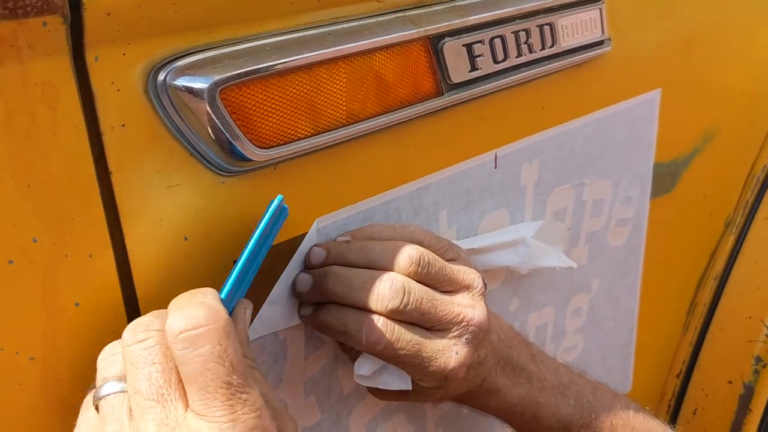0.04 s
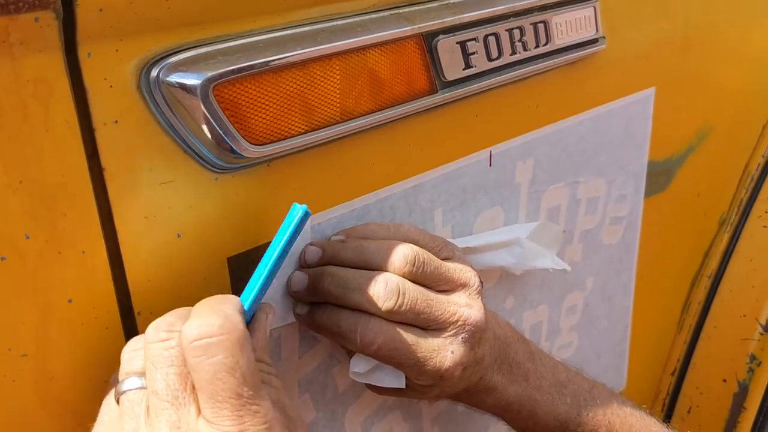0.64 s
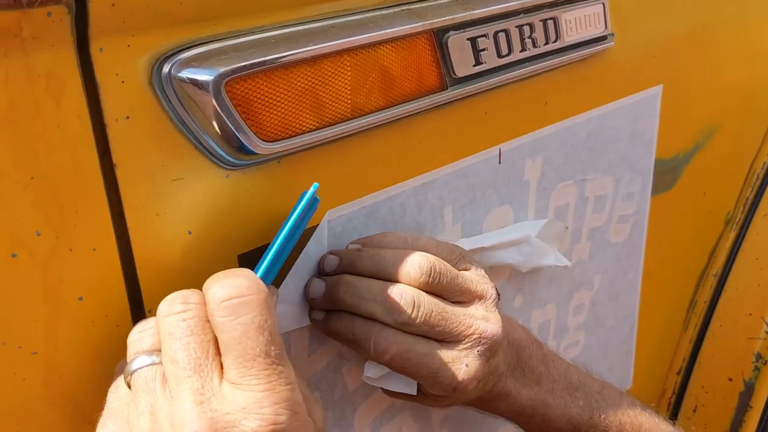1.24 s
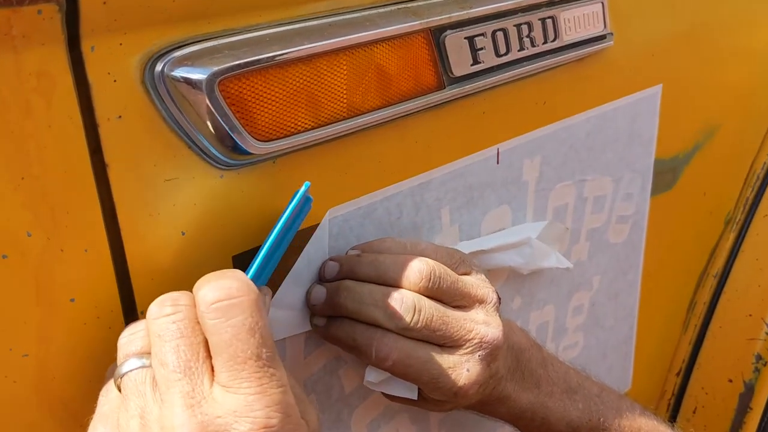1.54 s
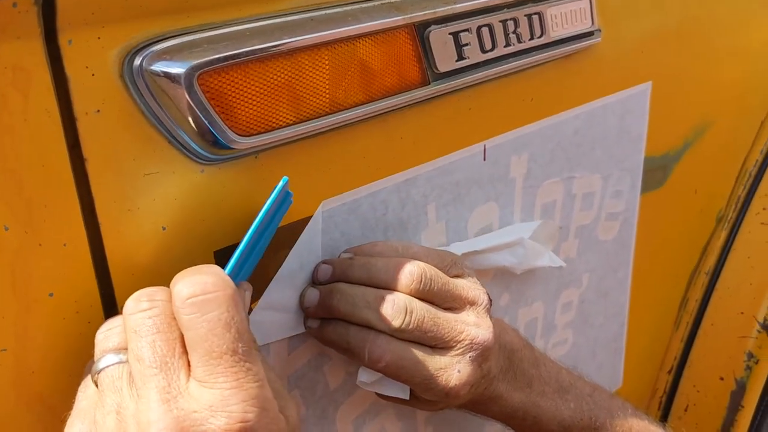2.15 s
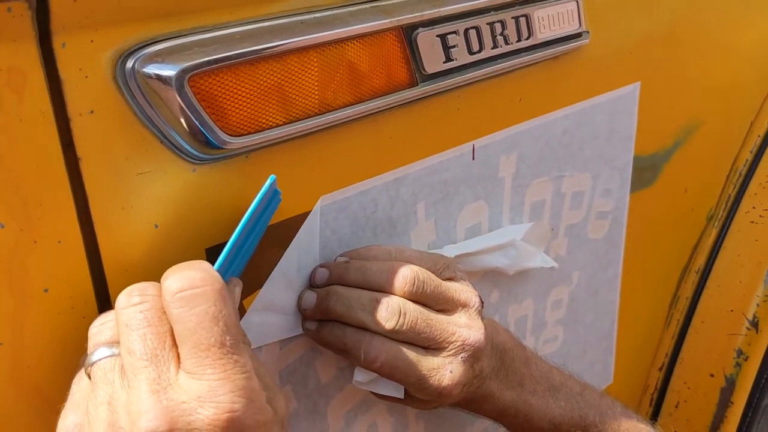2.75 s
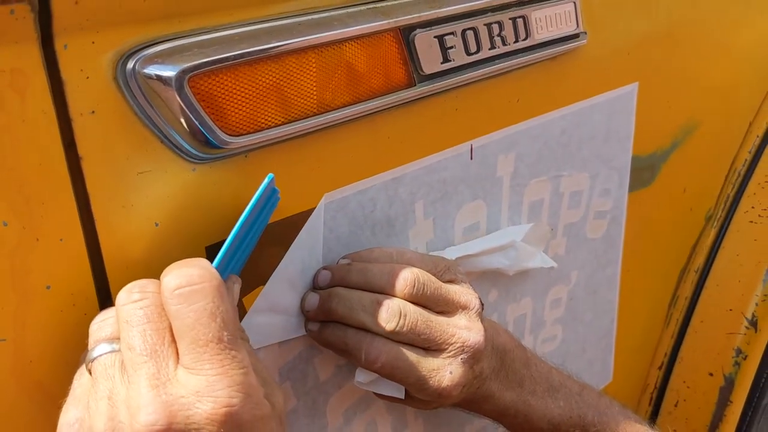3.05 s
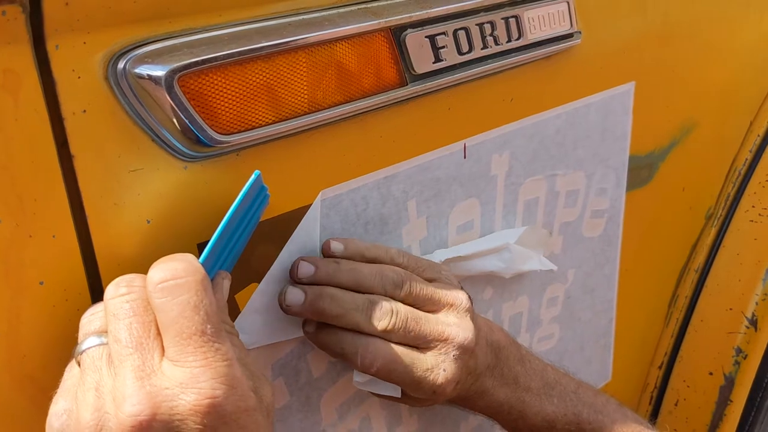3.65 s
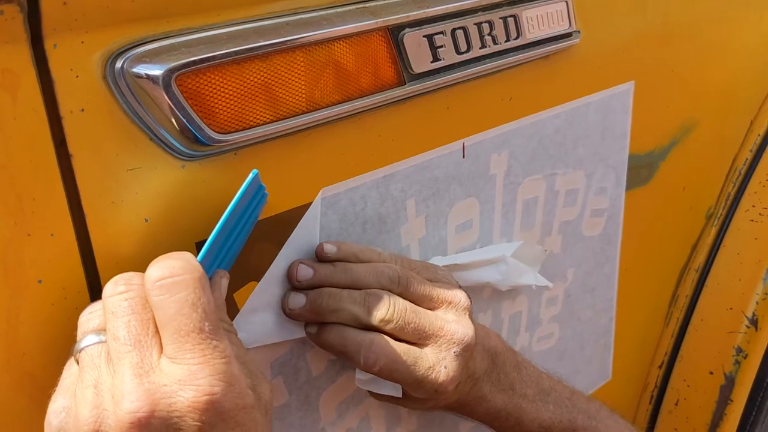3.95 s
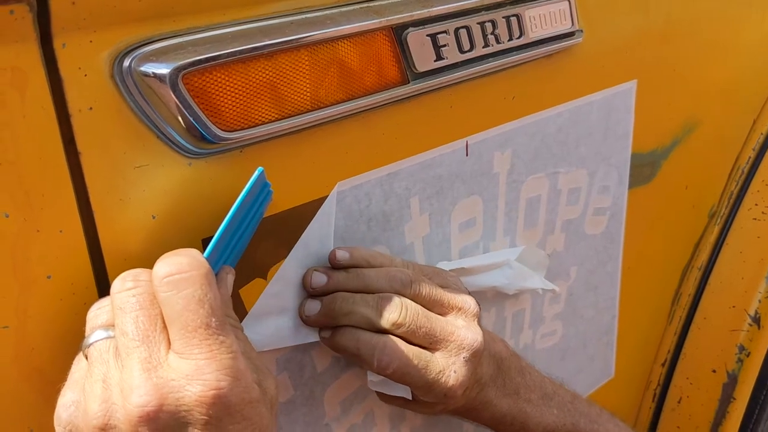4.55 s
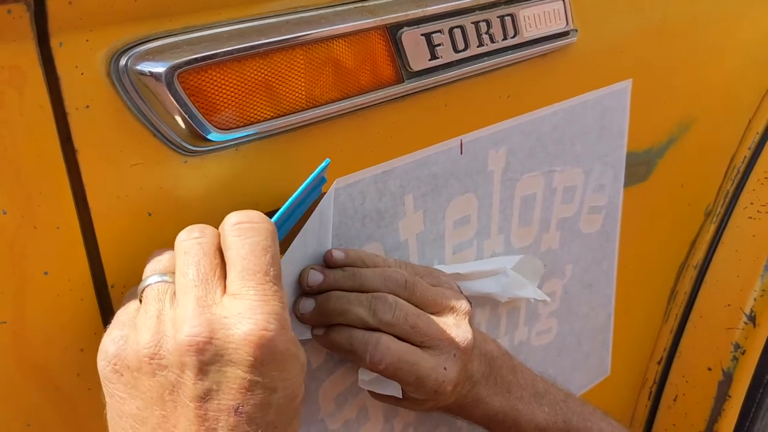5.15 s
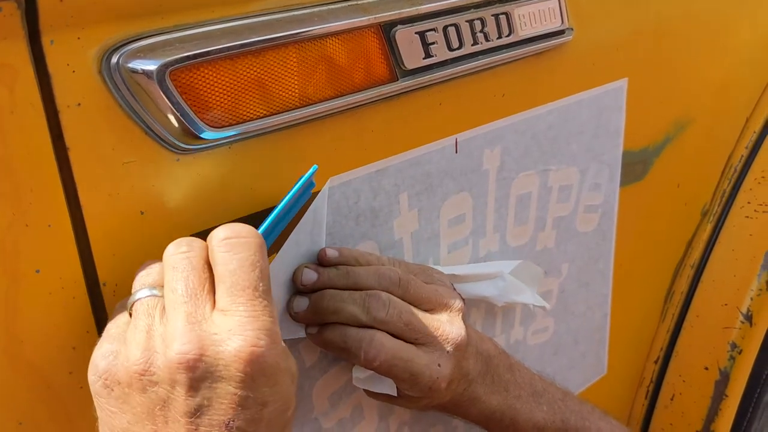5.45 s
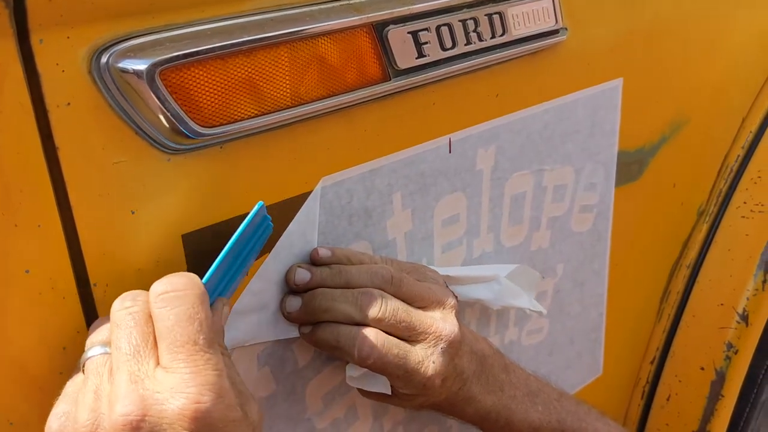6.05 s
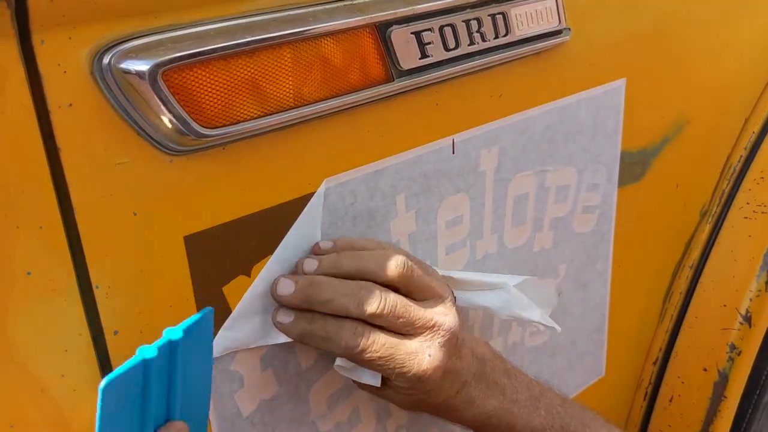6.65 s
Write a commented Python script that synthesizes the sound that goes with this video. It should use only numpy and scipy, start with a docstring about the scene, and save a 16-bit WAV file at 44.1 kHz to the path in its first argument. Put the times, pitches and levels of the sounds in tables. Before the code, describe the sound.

In a quiet workshop, three quick plastic knocks set a steel door panel ringing. Glue then crackles faintly as a paper sheet is pulled away by hand, with crisp snaps around the middle, soft rubbing strokes from a squeegee and fingers, and a last burst of crinkling. The microphone is close, picking up faint room air and a light rumble of moving air on the left.

```python
"""At a steel vehicle door in a quiet workshop, paper backing is slowly peeled off a stencil at arm's length. A
plastic squeegee knocks three times, setting the panel ringing; then it and the fingers rub and snag over the
paper. The glue lets go thread by thread in a fine crackle; the sheet ticks, slips and crinkles as it buckles.
Underneath lie room air, a soft low drone and a light draught brushing the left microphone port."""
import sys
import numpy as np
from scipy import signal
from scipy.fft import rfft, irfft
from scipy.io import wavfile
from scipy.ndimage import uniform_filter1d

SR = 44100
rng = np.random.default_rng(int(sys.argv[2]) if len(sys.argv) > 2 else 0)


def waveform_to_disk(signal):
    """Save audio, clipped to [-1, 1], as 16-bit WAV at the path in sys.argv[1]."""
    frames = np.transpose(np.atleast_2d(signal))
    scaled = np.clip(frames, -1, 1) * 32767
    samples = np.round(scaled).astype(np.int16)
    wavfile.write(sys.argv[1], SR, samples)


N = 303849
TIME = np.arange(N) / SR

# tone of the room air: f/Hz, level/dB
ROOM_EQ = [(20, 0.5), (70, 5), (200, 0), (350, -4.5), (500, 0.5), (700, -2), (1000, -0.5), (1200, -0.5),
           (1380, 2), (1600, -4.5), (2000, -2), (5000, -1.5), (6600, -7.5), (9000, 1), (15000, -1.5)]
# swells of the low drone: t/s, level/dB
DRONE_SWELLS = [(4.7, -80), (4.84, -65), (5.1, -76), (5.45, -78.5), (6.35, -92), (6.62, -65.5), (6.73, -72),
                (6.88, -61.5)]
# gusts of the draught: peak t/s, level/dB
DRAUGHT_GUSTS = [(0.05, -52.5), (0.24, -53.5), (0.75, -54.5), (1.08, -55.5), (1.39, -54), (1.71, -63),
                 (3.02, -54), (3.5, -59), (4.87, -57.5), (5.1, -58.5), (5.9, -56), (6.08, -53), (6.62, -58),
                 (6.87, -58)]
# eddies popping on the left port: t/s, level/dB, f/Hz
PORT_EDDIES = [(0.744, -42.5, 125), (0.913, -46.5, 103), (0.979, -48, 88.6), (1.022, -46.5, 96),
               (1.099, -50, 84.6), (1.123, -50.5, 148), (1.227, -53, 80), (1.355, -48.5, 192),
               (1.39, -43.5, 100), (1.425, -49, 125), (1.516, -50.5, 130), (1.614, -50, 81),
               (2.843, -39, 226), (2.856, -41, 104), (2.995, -44, 220), (3.007, -37, 101),
               (3.019, -45, 210), (3.032, -42.5, 100), (3.072, -48, 205), (3.084, -44.5, 99),
               (5.902, -45, 146)]
# rumble of moving air: f/Hz, level/dB
DRAUGHT_EQ = [(20, -41), (50, 5), (90, 5), (160, -3.5), (280, -15), (500, -31.5), (1500, -40)]

# main modes of the door skin: f/Hz, level/dB
PANEL_MODES = [(166, -9), (198, -9), (231, -11.5), (264, -11), (297, -8), (351, -8), (405, -5), (468, 2),
               (515, -2), (555, -9), (701, -3), (858, -9), (1049, 0.5), (1361, -7.5), (2164, -6),
               (2274, -7)]
# dense wash between those modes: f/Hz, level/dB, t60/s
PANEL_WASH = [(100, -14, 1.0), (171, -0.5, 1), (315, 6.5, 0.53), (487, 9, 0.54), (634, -4, 0.33),
              (880, 8.5, 0.34), (1620, -1.5, 0.16), (2200, -1.5, 0.15), (4000, -2.5, 0.089),
              (7960, -30, 0.052), (13970, -28, .04)]
# squeegee hits on the door: t/s, crack/dB, edge/dB, blade note f/Hz, blade/dB, clack f/Hz, clack/dB,
# thud/dB, singing note f/Hz, singing note/dB, panel ring/dB, low drum boost/dB
DOOR_KNOCKS = [(0.3622, -13.5, -23, 3450, -30, 2260, -22, -63, 291, -57, -39.5, -8.5),
               (0.5135, -8, -10.5, 7300, -32, 1110, -19.5, -32.5, 486, -40, -42, 1),
               (0.6958, -16.5, -50, 6300, -36, 1020, -44, -44, 472, -47, -42.5, -4.5)]
# crack of plastic on steel: f/Hz, level/dB
CRACK_EQ = [(100, -27), (400, -1), (1200, 5), (3000, 1.5), (5000, 3.5), (8000, -0.5), (11000, -13.5),
            (15000, -8)]
# bright edge on hits, ticks and rasps: f/Hz, level/dB
EDGE_EQ = [(3000, -25), (7000, 3), (10000, 0.5), (12000, 0.5), (14200, 4.5), (16000, -6.5)]

# the blade judders as it is turned: t/s, level/dB
SQUEAK_SWELL = [(6.41, -54), (6.435, -51.5), (6.48, -60.5)]
# the blade or the fingers snag on the paper: t/s, level/dB, decay/s
PAPER_SNAGS = [(3.4995, -57, .008), (3.6885, -58, .004), (3.704, -45.5, 0.013), (3.811, -52, .005),
               (4.9033, -41.5, 0.0031), (4.92, -47, .004), (5.032, -43, 0.0045), (5.1733, -45, 0.0034),
               (5.275, -50, 0.0046), (5.2955, -46, .004), (5.354, -47, .003)]
# scratch of a snag: f/Hz, level/dB
SNAG_EQ = [(300, -15), (1000, -1.5), (2600, 2.5), (7000, -3.5), (15000, -30)]
# the blade swipes over the paint: start/s, peak/s, end/s, hiss/dB, rasp/dB, body/dB
PAINT_SWIPES = [(-0.02, 0.071, 0.19, -54, -53.5, -55.5), (0.409, 0.502, 0.52, -50.5, -46.5, -55.5),
                (6.548, 6.645, 6.73, -92, -71, -73)]
# fingers and squeegee rub the paper: start/s, end/s, hiss/dB, body/dB, body f/Hz
PAPER_STROKES = [(3.474, 3.547, -59, -69, 1500), (3.52, 3.642, -68, -63, 2060),
                 (3.688, 3.827, -62, -57.5, 1820), (3.799, 3.96, -61.5, -63, 1380),
                 (4.101, 4.32, -65, -67, 940), (4.252, 4.65, -78, -70.5, 1300),
                 (4.706, 4.965, -68.5, -69, 1050), (4.884, 5, -64.5, -61, 1090),
                 (5.015, 5.129, -62, -58.5, 970), (5.11, 5.204, -53.5, -55.5, 1040),
                 (5.153, 5.207, -68, -52.5, 960), (5.277, 5.38, -60.5, -58.5, 1020),
                 (5.392, 5.482, -57.5, -49, 940), (5.659, 5.94, -68.5, -65.5, 890),
                 (5.86, 6.33, -65.5, -63.5, 1050), (6.486, 6.7, -63, -67.5, 1130),
                 (6.777, 6.902, -67.5, -60.5, 1470)]
# the hands drift to the left: t/s, delay at the right port/s
HAND_DRIFT = [(3.8, 0.000062), (5.3, 0.00015), (6.7, .00017)]
# hiss of rubbed fibres: f/Hz, level/dB
RUB_EQ = [(150, -5), (700, -8), (1600, -7), (3000, 1.5), (7000, -0.5), (10000, -5), (15000, -12.5)]
# a dragged blade stirs mostly the door's mids: f/Hz, level/dB
DRAG_EQ = [(180, -10.5), (400, -1.5), (950, -1), (2200, -3.5)]

# the sheet catches and slips in a stutter: t/s, level/dB
SHEET_SLIPS = [(6.231, -41.5), (6.3245, -43), (6.343, -44), (6.354, -47), (6.365, -49), (6.375, -47),
               (6.3865, -53), (6.402, -58), (6.4285, -46), (6.466, -47), (6.523, -50), (6.533, -43),
               (6.643, -44)]
# narrow rasp of a slip: f/Hz, level/dB
SLIP_EQ = [(1000, -8), (3500, -31), (5000, -0.5), (6800, -2), (8200, -17), (15000, -29)]
# stiff folds pop through: t/s, level/dB, f/Hz
FOLD_POPS = [(3.457, -24, 5800), (3.4587, -25, 5300), (6.2788, -25, 7500), (6.2822, -11.5, 7000)]
# the sheet buckles: start/s, end/s, crackle/dB, hollow note/dB, fizz/dB
BUCKLES = [(3.4128, 3.418, -42, -45.5, -39), (3.418, 3.44, -48.5, -55, -47), (3.4543, 3.467, -35, -43, -52),
           (6.1985, 6.2244, -35, -61, -35), (6.256, 6.309, -44, -62, -56), (6.274, 6.284, -34.5, -57, -44),
           (6.2774, 6.281, -27.5, -42, -38), (6.2812, 6.284, -23, -58, -25), (6.429, 6.437, -57, -53, -53),
           (6.544, 6.549, -36, -44, -47), (6.654, 6.674, -50, -65, -56), (6.691, 6.716, -56, -62.5, -48.5)]
# the loudest snaps of glue and paper: t/s, snap/dB, edge/dB
LOUD_TICKS = [(1.231, -45, -31), (2.0287, -44, -31), (2.3606, -43, -29.5), (2.3716, -43, -29.5),
              (2.5284, -33, -29), (3.0475, -39, -29.5), (3.053, -37, -26), (3.127, -33, -20.5),
              (3.135, -24, -21), (3.149, -24, -15.5), (3.1617, -19, -39), (3.2898, -35, -29.5),
              (3.4145, -22, -16.5), (3.9842, -24.5, -33), (4.1095, -30, -40), (4.2482, -25, -38),
              (4.347, -33, -38), (6.11, -40, -36.5), (6.451, -25, -32), (6.4658, -24, -38),
              (6.547, -26, -40), (6.6563, -21.5, -38)]
# crisp tone of creasing paper: f/Hz, level/dB
PAPER_EQ = [(300, -26), (1500, -14), (3500, -3), (5600, 2), (7500, 4.5), (10000, 1.5), (15000, -13)]
# how hard the backing is pulled: t/s, level/dB
PEEL_PULL = [(0.85, -66), (0.93, -60), (1.1, -65.5), (1.23, -57.5), (1.75, -59), (2.25, -59), (2.8, -57.5),
             (3.18, -54), (3.39, -61.5), (3.6, -69), (3.95, -61.5), (4.18, -54.5), (4.3, -56),
             (4.42, -57.5), (4.72, -61), (4.87, -66), (5.6, -77), (6.15, -62.5), (6.36, -70), (6.49, -62),
             (6.56, -62), (6.67, -59), (6.75, -77), (6.82, -54.5), (6.88, -58)]
# note of the lifted flap, lower as the flap grows: t/s, f/Hz
FLAP_NOTE = [(0.9, 7100), (3.2, 7200), (4.1, 6440), (6.8, 5900)]
# sizzle of parting glue: f/Hz, level/dB
GLUE_EQ = [(800, -16), (2500, -24), (4000, -7.5), (4500, 3.5), (5000, 0), (7000, -2), (10000, 2.5),
           (12500, 4.5), (15000, 6.5)]

# sharp sounds beam their top to the left; what reaches the right port: f/Hz, level/dB
SHADOW_EQ = [(8000, 0), (11000, -10), (15000, -7.5)]
# tone of the left port: f/Hz, level/dB
LEFT_EQ = [(300, 2), (1050, 0.5), (1350, 4), (1650, 0), (2150, 5.5), (2700, 0.5), (4500, 3.5), (5300, 2.5),
           (6400, -3), (7500, 0.5), (8700, -1), (9800, -4.5), (13000, -2), (16000, -7.5)]
# tone of the right port with its cavity peak: f/Hz, level/dB
RIGHT_EQ = [(300, 2), (1150, -1), (1450, 1.5), (1800, 1.5), (3000, 2), (4700, 3), (5750, 8), (6130, 5),
            (6600, 14), (7050, 8), (7450, 7), (8200, 3.5), (10200, -8.5), (13000, -5.5), (16000, -8.5)]

SWIPE_HZ, SWIPE_LAG_S = 1080, 0.00019  # body note under the blade; delay at the right port
FIRM_DB, FIRM_ATTACK_S, ATTACK_DOUBLES_DB = -53, 0.023, 8  # firm strokes bite fast, light ones ease in
DOOR_DB_PER_OCTAVE = -6.5  # lifted paper hums higher and passes less on to the door
BLADE_T60_S, CLACK_T60_S = .012, 0.0095
THUD_HZ, THUD_T60_S, SING_T60_S = 406.5, 0.17, 0.38  # the steel under the blade thuds, one note sings on
LEAD_IN_DB, LEAD_IN_S = -19, 0.0013  # a very short, faint noise swell leads into each knock


def undb(db):
    """Decibels to gain."""
    return 10 ** (np.asarray(db) / 20)


def along(hz, points, axis=1):
    """Read a column of a table along log frequency."""
    points = np.array(points)
    return np.interp(np.log(np.maximum(hz, 1)), np.log(points[:, 0]), points[:, axis])


def convolve(x, response):
    """Pass one or two channels through an impulse response."""
    return np.apply_along_axis(lambda v: signal.oaconvolve(v, response)[:len(v)], -1, x)


def colour(x, points, keep_power=True, size=4096):
    """Minimum-phase EQ through f/Hz, level/dB points."""
    bins_hz = np.arange(size // 2 + 1) * SR / size
    cepstrum = irfft(np.log(undb(along(bins_hz, points))))
    cepstrum[1:size // 2] *= 2
    cepstrum[size // 2 + 1:] = 0
    response = irfft(np.exp(rfft(cepstrum)))
    return convolve(x, response / np.linalg.norm(response) if keep_power else response)


def resonate(x, hz, width_hz):
    """A steep resonance that keeps the power of white noise."""
    t = TIME[:SR // 20]
    response = t * np.exp(-np.pi * width_hz * t) * np.sin(2 * np.pi * hz * t)
    return convolve(x, response / np.linalg.norm(response))


def grains(per_s, spread_db, aim=1.0):
    """Tiny random clicks, each of its own size and aimed unevenly at the two ports; rms 1."""
    size = undb(spread_db * np.minimum(rng.exponential(size=N), np.log(100)))
    clicks = (rng.random(N) < per_s / SR) * size * rng.choice([-1, 1], N)
    stereo = clicks * (1 + aim * rng.standard_normal((2, N)))
    return stereo / np.std(stereo)


def walk(per_s):
    """Random modulator: sample and hold, slewed twice."""
    hold = max(int(SR / per_s), 1)
    held = rng.standard_normal(N)[np.arange(N) // hold]
    return np.sqrt(2) * uniform_filter1d(uniform_filter1d(held, hold), hold)


def follow(table, fade_s):
    """Gain envelope from t/s, level/dB rows, fading to silence at both ends."""
    s, db = np.transpose(table)
    return np.interp(TIME, np.r_[s[0] - fade_s, s, s[-1] + fade_s], np.r_[0, undb(db), 0])


def add(track, s, sound):
    """Mix a sound in at a time."""
    i = int(np.clip(s * SR, 0, N - 1))
    track[..., i:i + sound.shape[-1]] += sound[..., :N - i]


def shade(x):
    """The right port misses some of the top."""
    return np.array([x[0], colour(x[1], SHADOW_EQ, keep_power=False)])


def arrive(x, lag_s, scatter_db, scatter_s):
    """Direct sound, lag_s later on the right, plus reflections off hands and door for each port."""
    t = TIME[:SR // 16]
    ports = []
    for side, delay_s in zip(x, (0, lag_s)):
        paths = rng.standard_normal(len(t)) * np.exp(-t / scatter_s) * (t > 1 / 1000)
        paths *= undb(scatter_db) / np.linalg.norm(paths)
        paths[int(round(delay_s * SR))] += 1
        ports.append(convolve(side, paths))
    return np.array(ports)


def room_tone(level_db, shared_hz):
    """A bed of quiet air, centred in the bass and wide in the treble."""
    noise = rng.standard_normal((3, N))
    low = signal.butter(1, shared_hz, fs=SR, output="sos")
    high = signal.butter(1, shared_hz, "high", fs=SR, output="sos")
    ports = signal.sosfilt(low, noise[2]) + signal.sosfilt(high, noise[:2])
    return colour(ports, ROOM_EQ) * undb(level_db + .5 * walk(2.75))


def drone(level_db):
    """A soft low band of noise comes and goes in the room."""
    band = resonate(rng.standard_normal(N), hz=304, width_hz=61)
    return follow(DRONE_SWELLS, fade_s=0.089) * undb(level_db) * band


def draught(level_db, flutter_db, calm_db=-73, rise_s=0.082, fall_s=0.1, eddy_cycles=0.72):
    """Moving air rumbles on the left port in gusts; eddies pop against it for a cycle or two."""
    flow = np.full(N, undb(calm_db))
    for s, db in DRAUGHT_GUSTS:
        gust = undb(db) * np.exp(-np.maximum((s - TIME) / rise_s, (TIME - s) / fall_s))
        flow = np.maximum(flow, gust)
    flow *= undb(level_db + flutter_db * walk(8.4))
    air = flow * colour(rng.standard_normal((2, N)), DRAUGHT_EQ)
    for s, db, hz in PORT_EDDIES:
        cycles = (TIME - s) * hz
        air += undb(db) * np.exp(-(cycles / eddy_cycles) ** 2) * np.cos(2 * np.pi * cycles)
    return air * undb([[0], [-24.0]])  # panned far left


def squeaking():
    """The edge of the blade sticks and slips around one faint, rough note."""
    judder = follow(SQUEAK_SWELL, fade_s=0.034) * grains(per_s=3200, spread_db=2.0, aim=0.74)
    return resonate(judder, hz=943, width_hz=260)


def snagging(level_db, rise_s=.0008):
    """The blade or a fingertip catches and breaks free with a short scratch."""
    bursts, t = np.zeros(N), TIME[:SR // 20]
    for s, db, decay_s in PAPER_SNAGS:
        add(bursts, s, undb(db + level_db) * np.minimum(t / rise_s, 1) * np.exp(-t / decay_s))
    return colour(bursts * grains(per_s=6900, spread_db=0.5, aim=0.41), SNAG_EQ)


def door_ring(drum_db, modes_db, wash_db, wide_above_hz=1200):
    """Struck steel: modes, different each blow, over a noise wash; the lows are long and centred."""
    t = TIME[:SR * 3 // 4]
    drum = lambda hz: undb(drum_db * np.exp(-(np.log2(hz / 380) / 1.17) ** 2))  # low-mid bell EQ
    fade = lambda hz: np.exp(-np.log(1000) * t / along(hz, PANEL_WASH, axis=2))
    ring = np.zeros((2, len(t)))
    strike = rng.uniform(-0.99, 1, (len(PANEL_MODES), 3))
    for (hz, db), (size, detune, phase) in zip(PANEL_MODES, strike):
        wave = np.sin(2 * np.pi * (hz * (1 + 0.0068 * detune) * t + phase))
        ring += undb(modes_db + db + 2 * size) * drum(hz) * fade(hz) * wave
    for hz in np.geomspace(110, 14000, 22):
        band = signal.butter(3, [hz / 1.12, hz * 1.12], "band", fs=SR, output="sos")
        noise = rng.standard_normal((3, len(t)))
        stereo = (wide_above_hz * noise[2] + hz * noise[:2]) / np.hypot(wide_above_hz, hz)
        wash = signal.sosfilt(band, stereo)
        ring += undb(wash_db + along(hz, PANEL_WASH)) * drum(hz) * fade(hz) * wash
    return ring


def hand_moves(paper_rasp_db=-5.5):
    """Swipes and strokes: start/s, peak/s, end/s, hiss/dB, rasp/dB, body/dB, body f/Hz, right lag/s."""
    moves = [(*swipe, SWIPE_HZ, SWIPE_LAG_S) for swipe in PAINT_SWIPES]
    for start, end, hiss_db, body_db, hz in PAPER_STROKES:
        lightness_db = max(FIRM_DB - max(hiss_db, body_db), 0)
        attack_s = min(FIRM_ATTACK_S * 2 ** (lightness_db / ATTACK_DOUBLES_DB), (end - start) / 2)
        lag_s = np.interp(start, *np.transpose(HAND_DRIFT))
        moves.append((start, start + attack_s, end, hiss_db, hiss_db + paper_rasp_db, body_db, hz, lag_s))
    return moves


def rubbing(hiss_db, grit_db, rasp_db, body_db, door_db):
    """Each stroke swells and dies: fibres catch and hiss, the paper hums and the door rings along."""
    fibres = grains(per_s=10000, spread_db=1.5) * undb(1.7 * walk(200) + 0.45 * walk(45))
    fibres += undb(grit_db) * grains(per_s=290, spread_db=1.0, aim=0.81)
    drag = grains(per_s=12000, spread_db=2.1, aim=0.43)
    hiss, rasp, body, panel = np.zeros((4, 2, N))
    for start, peak, end, stroke_db, bright_db, hum_db, hz, lag_s in hand_moves():
        span = slice(max(int(start * SR), 0), int(end * SR) + SR // 50)
        ramp = np.interp(TIME[span], [start, peak, end], [0, 1, 0])
        press = np.sin(np.pi / 2 * ramp) ** 1.7
        lag = int(round(lag_s * SR))
        catch, push = (press * np.array([x[0, span], np.roll(x[1, span], lag)]) for x in (fibres, drag))
        hiss[:, span] += undb(stroke_db + hiss_db) * catch
        rasp[:, span] += undb(bright_db + rasp_db) * catch
        body[:, span] += undb(hum_db + body_db) * resonate(push, hz, width_hz=0.5 * hz)
        panel[:, span] += undb(hum_db + door_db + DOOR_DB_PER_OCTAVE * np.log2(hz / SWIPE_HZ)) * push
    ring = colour(door_ring(drum_db=-11.5, modes_db=-5.5, wash_db=6.0)[0], DRAG_EQ)
    door = convolve(panel, ring / np.linalg.norm(ring))
    return colour(hiss, RUB_EQ) + colour(rasp, EDGE_EQ) + body + door


def knocking(chatter_db, chatter_s):
    """Hard plastic hits the door: a crack and clack, a brief blade note, a thud, then ringing steel."""
    cracks, edges, rings = np.zeros((3, 2, N))
    t = TIME[:SR // 4]
    mode = lambda hz, t60_s: np.cos(2 * np.pi * hz * t) * np.exp(-np.log(1000) * t / t60_s)
    for (s, crack_db, edge_db, blade_hz, blade_db, clack_hz, clack_db,
         thud_db, sing_hz, sing_db, ring_db, drum_db) in DOOR_KNOCKS:
        contact = undb(chatter_db) * np.exp(-t / chatter_s) * rng.standard_normal((2, len(t)))
        contact[:, 0] = 1  # the hit itself, ahead of the chatter
        lead_in = np.exp(-t[::-1] / LEAD_IN_S) * rng.standard_normal(len(t))
        add(cracks, s - t[-1], undb(crack_db + LEAD_IN_DB) * lead_in)
        add(cracks, s, undb(crack_db) * contact)
        add(edges, s, undb(edge_db) * contact)
        add(rings, s, undb(clack_db) * mode(clack_hz, CLACK_T60_S))
        add(rings, s, undb(blade_db) * mode(blade_hz, BLADE_T60_S))
        add(rings, s, undb(thud_db) * mode(THUD_HZ, THUD_T60_S))
        add(rings, s, undb(sing_db) * mode(sing_hz, SING_T60_S))
        add(rings, s, undb(ring_db) * door_ring(drum_db, modes_db=-5.0, wash_db=10))
    return colour(cracks, CRACK_EQ) + colour(edges, EDGE_EQ) + rings


def slipping(level_db, half_width_s=0.0033):
    """Each slip of the sheet is a soft, narrow burst of fibres letting go."""
    bursts = sum(undb(db + level_db) * np.exp(-((TIME - s) / half_width_s) ** 2) for s, db in SHEET_SLIPS)
    return colour(bursts * grains(per_s=15000, spread_db=4.0, aim=0.32), SLIP_EQ)


def popping(half_width_s=.00033):
    """A fold flips over and shakes the sheet for a few cycles: one dry, pitched click."""
    pops = np.zeros(N)
    for s, db, hz in FOLD_POPS:
        t = TIME - s
        pops += undb(db) * np.exp(-(t / half_width_s) ** 2) * np.cos(2 * np.pi * hz * t)
    return pops


def crinkling(run_db, note_db, fizz_db, rise_share, fall_power):
    """The sheet buckles and runs out in quick creases, which also sound the hollow note of its curl."""
    runs, flexing, fizzing = np.zeros((3, N))
    for start, end, crackle_db, hollow_db, top_db in BUCKLES:
        progress = np.linspace(0, 1, max(int((end - start) * SR), SR // 1000))
        run = np.minimum(progress / rise_share, 1) * (1 - progress) ** fall_power
        add(runs, start, undb(crackle_db + run_db) * run)
        add(flexing, start, undb(hollow_db + note_db) * run)
        add(fizzing, start, undb(top_db + fizz_db) * run)
    creases = grains(per_s=9000, spread_db=2.5, aim=0.5)
    hollow = resonate(flexing * grains(per_s=7000, spread_db=1.5, aim=0.94), hz=1340, width_hz=440)
    return colour(runs * creases, PAPER_EQ) + colour(fizzing * creases, EDGE_EQ) + hollow


def ticking(snap_db, edge_db, stray_per_s, stray_db, stray_edge_db):
    """Single creases flip and spots of glue let go; faint random strays get louder with the pull."""
    triggers = rng.random(N) < stray_per_s / SR
    snaps = triggers * follow(PEEL_PULL, fade_s=.03) * undb(stray_db + 2 * rng.standard_normal(N))
    edges = undb(stray_edge_db) * snaps
    for s, db, sharp_db in LOUD_TICKS:
        add(snaps, s, undb([db + snap_db]))
        add(edges, s, undb([sharp_db + edge_db]))
    return colour(snaps, PAPER_EQ) + colour(edges, EDGE_EQ)


def peeling(level_db, uneven_db, surge_db, flap_db, flap_width_hz=1100):
    """Glue threads snap as the peel line creeps and catches; the lifted flap rings with them."""
    pull = follow(PEEL_PULL, fade_s=0.033) * undb(level_db + uneven_db * walk(70) + surge_db * walk(15))
    snaps = pull * grains(per_s=3000, spread_db=1.5)
    # gliding resonance: shift the flap's note down to 0 Hz, low-pass, shift back up
    flap_hz = np.interp(TIME, *np.transpose(FLAP_NOTE))
    carrier = np.exp(2j * np.pi * np.cumsum(flap_hz) / SR)
    pole = np.exp(-np.pi * flap_width_hz / SR)
    flap = np.real(carrier * signal.lfilter([np.sqrt(2 * (1 - pole ** 2))], [1, -pole], snaps / carrier))
    return colour(snaps + undb(flap_db) * flap, GLUE_EQ)


def scene():
    """Mix paper, strokes and knocks over the bed of draught, drone and room air."""
    creases = crinkling(run_db=-1.0, note_db=0.8, fizz_db=-5.0, rise_share=0.11, fall_power=0.51)
    creases += popping()
    creases += ticking(snap_db=-5.5, edge_db=3.0, stray_per_s=12, stray_db=12, stray_edge_db=2)
    paper = peeling(level_db=-1.5, uneven_db=1.5, surge_db=1.2, flap_db=-5.0)
    paper += slipping(level_db=-9.5) + shade(creases)
    paper = arrive(paper, lag_s=0.00015, scatter_db=-13, scatter_s=.006)
    strokes = rubbing(hiss_db=6.0, grit_db=-10.5, rasp_db=3.0, body_db=-2.0, door_db=-2.0)
    strokes += snagging(level_db=-4.5) + squeaking()
    strokes = arrive(strokes, lag_s=0, scatter_db=-11, scatter_s=.015)
    knocks = shade(knocking(chatter_db=-20.5, chatter_s=0.0052))
    knocks = arrive(knocks, lag_s=0.0002, scatter_db=-13.5, scatter_s=0.019)
    bed = draught(level_db=-2.0, flutter_db=2.0) + drone(level_db=-4.0)
    bed += room_tone(level_db=-61.5, shared_hz=740)
    return bed + strokes + knocks + paper


def record(dry):
    """Each port has its own colour, the right one a sharp cavity resonance; the top is cut."""
    ports = [colour(x, eq, keep_power=False) for x, eq in zip(dry, (LEFT_EQ, RIGHT_EQ))]
    high_cut = signal.ellip(10, .2, 70, 16100, fs=SR, output="sos")
    return signal.sosfilt(high_cut, ports)


dry = scene()
out = record(dry)
waveform_to_disk(out)
```